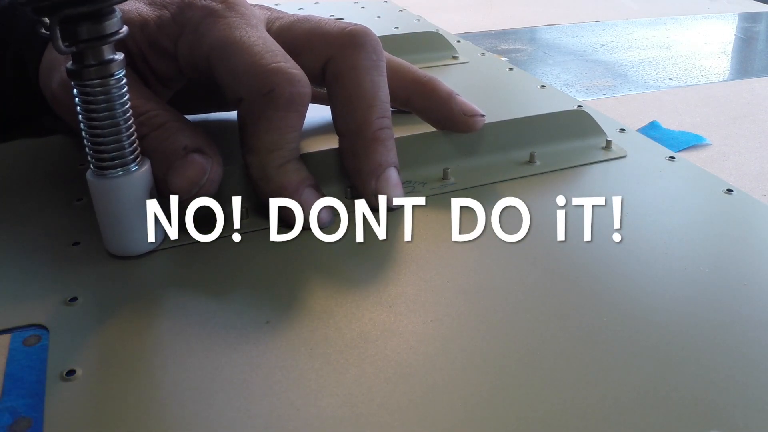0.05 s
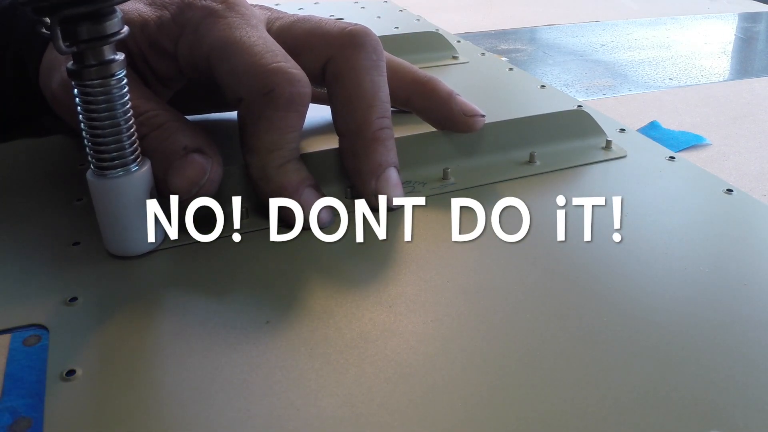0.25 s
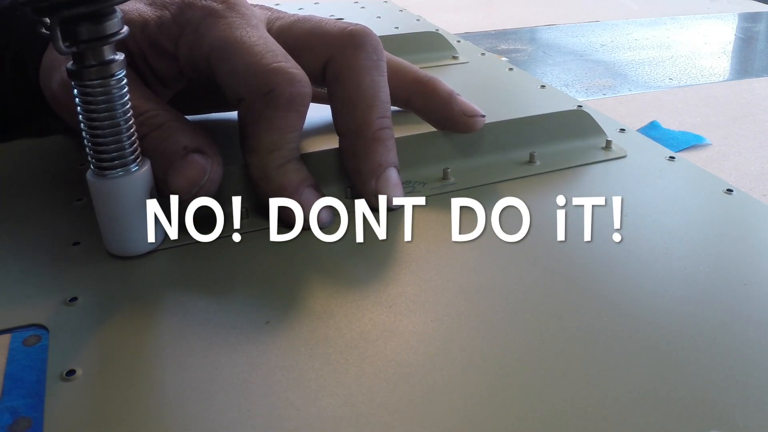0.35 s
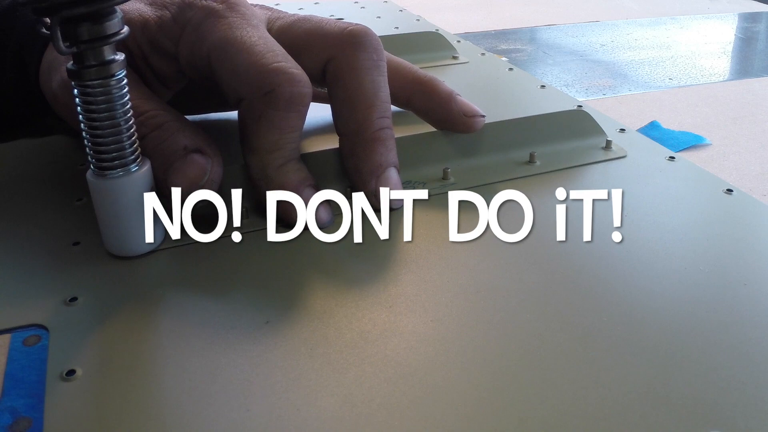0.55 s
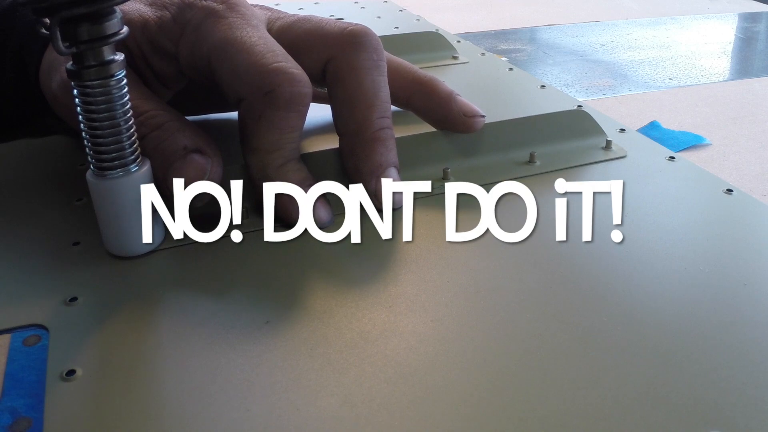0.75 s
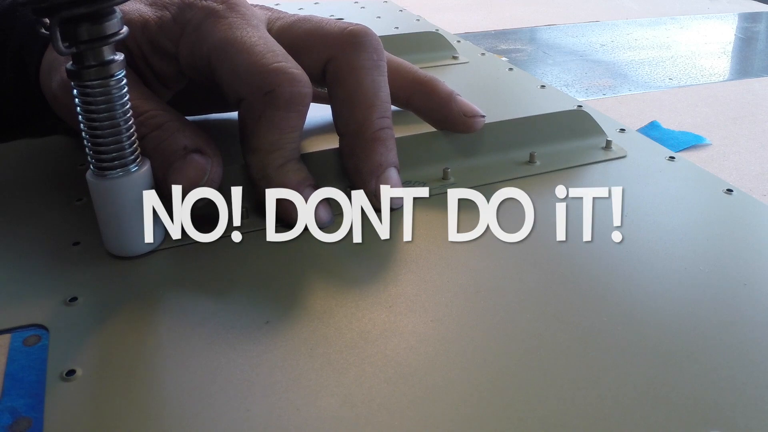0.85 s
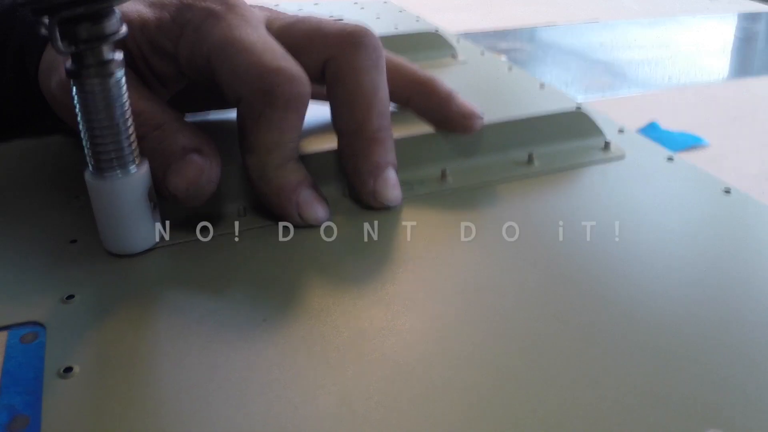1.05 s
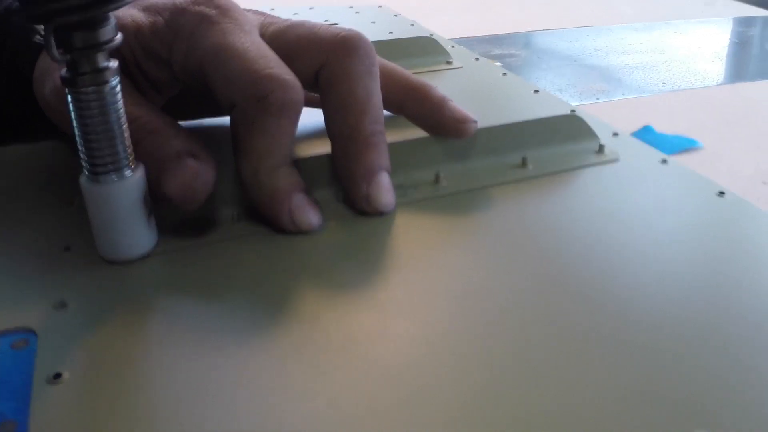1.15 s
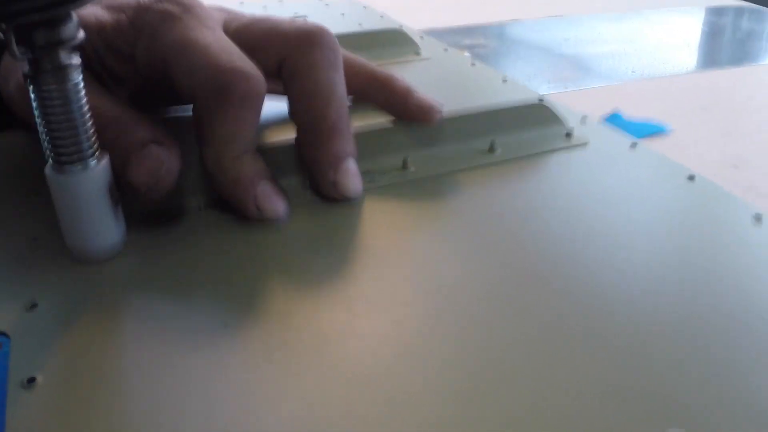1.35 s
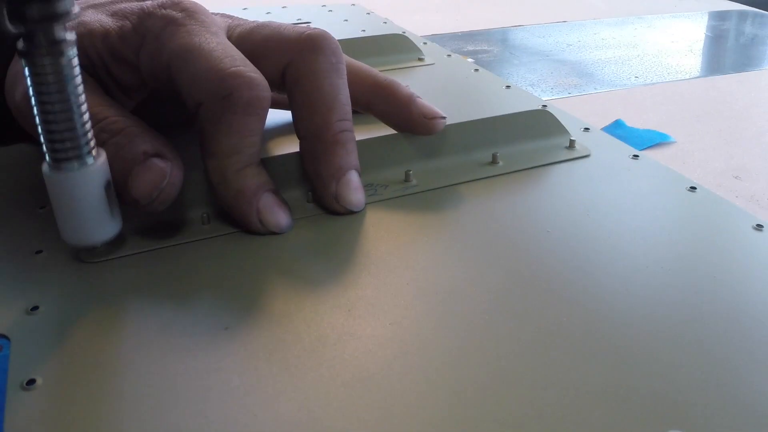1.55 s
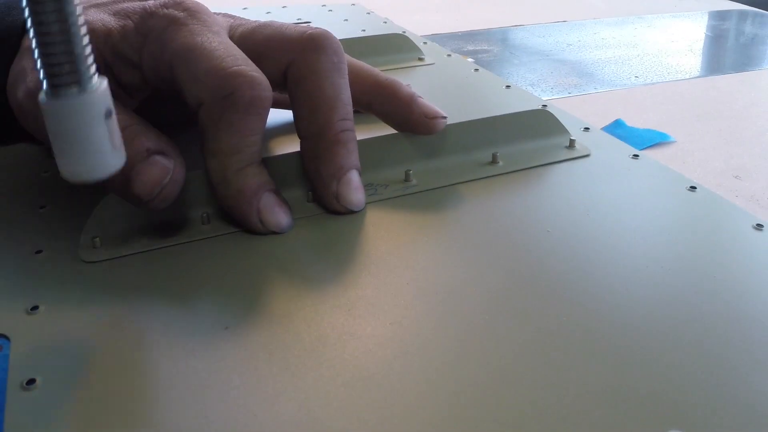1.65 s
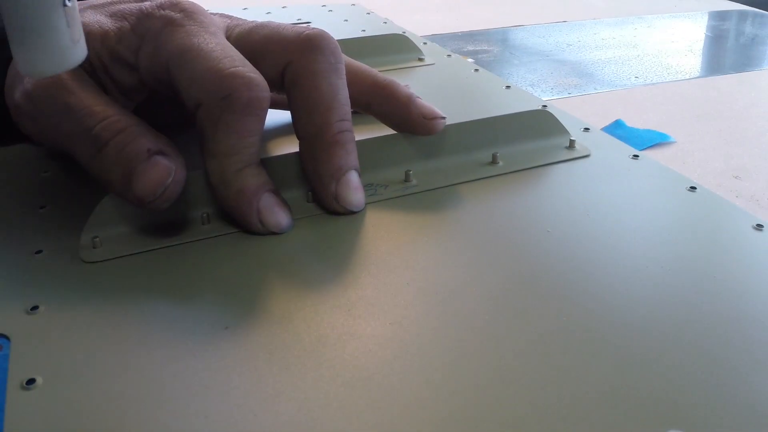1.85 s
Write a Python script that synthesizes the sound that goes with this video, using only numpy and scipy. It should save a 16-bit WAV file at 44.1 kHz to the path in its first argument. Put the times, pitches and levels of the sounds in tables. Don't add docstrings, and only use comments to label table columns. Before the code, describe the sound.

Close microphone on an air-powered riveting hammer: air rushes through its ports and rises to a whistle, cuts off, then the piston bangs thin aluminium in a quick burst, fading into a quiet, echoing shop.

```python
import sys
import numpy as np
from scipy import signal
from scipy.fft import rfft, irfft
from scipy.io import wavfile
from scipy.ndimage import uniform_filter1d

SR = 44100
rng = np.random.default_rng(int(sys.argv[2]) if len(sys.argv) > 2 else 0)


def rack_gain(trim_db):
    fader = np.asarray(trim_db, float)
    return 10 ** (fader / 20)


def dump_mix(stems):
    frames = np.atleast_2d(stems).T
    limited = np.clip(frames, -1, 1)
    pcm = np.round(limited * 32767).astype(np.int16)
    wavfile.write(sys.argv[1], SR, pcm)


N = 83790
TOP_HZ = 15270

# frequency in Hz, level in dB.
HUM_COLOUR = [(25, -0.5), (60, -4), (150, -7), (400, -8.5), (800, -12.5), (1100, -24.5), (4000, -41),
              (15000, -52)]
# centre in Hz, level in dB, time to fade by 60 dB in seconds.
SHOP_TAIL = [(60, -31.5, 1), (125, -37.5, 1), (265.4, -43, 0.95), (495, -43, .65), (926, -40.5, 0.84),
             (1884, -44, 0.65), (4270, -42, .55), (8200, -45.5, .45), (13000, -45.5, .35)]
# time in seconds, level in dB.
AIR_FLOW = [(0, -34), (.015, -31.5), (.06, -36.5), (.178, -36), (.2, -25), (.27, -21.5), (.5, -21.5),
            (.8, -21.5), (.94, -20), (1.075, -17), (1.1, -23), (1.128, -21), (1.142, -41), (1.16, -45.5),
            (1.4, -60), (1.46, -69), (1.6, -53.5), (1.9, -95.5)]
# frequency in Hz, width in Hz, level in dB.
PORT_RESONANCES = [(1395, 456, -14.5), (2052, 347, -7.5), (2664, 143, -9.5), (3457, 630, -9),
                   (4500, 199, 1.5), (5100, 296, -6), (6110, 960, -8), (6906, 300, -6), (7550, 300, -10.5),
                   (8710, 650, -14.5), (9400, 450, -17), (11100, 380, -18.5), (12600, 410, -21.5),
                   (13700, 500, -27)]
# frequency in Hz, level in dB.
JET_COLOUR = [(30, -22), (100, -27.5), (400, -29), (800, -25), (1100, -26), (2000, -40)]
# start in seconds, level in dB, length in seconds.
EXHAUST_PUFFS = [(1.1291, -11, 0.0038), (1.175, -40, .006), (1.233, -34, 0.0036), (1.241, -41, 0.0025),
                 (1.287, -38, 0.0035), (1.293, -40, 0.0026), (1.341, -33, 0.0027), (1.349, -34, 0.0022),
                 (1.399, -34, 0.0025), (1.404, -37, 0.0026), (1.474, -49, .004), (1.6396, -35.5, .003)]
# start in seconds, level in dB, frequency in Hz,
# time to fade by 60 dB in seconds.
BENCH_JOLTS = [
    (1.0973, -23, 242, 0.057),
    (1.11, -21.5, 128, 0.069),
    (1.1296, -11, 148, 0.044),
]
# start in seconds, then force, thud, ring and crack, all in dB.
PISTON_BLOWS = [
    (1.0968, -22.5, 3.5, -9.5, -7),
    (1.1306, -6, 0, -3.5, -8.5),
    (1.1482, 0, 0, 1, 7),
    (1.2038, 2, -5.5, -3, 2.5),
    (1.2580, -4.5, 1.5, 3.5, 6.5),
    (1.3127, 0.5, -3.5, -1, 1.5),
    (1.3681, -1.5, -2.5, 0.5, 3.5),
    (1.4276, 2, -5, -2, -0.5),
    (1.5369, -8, 1.5, 4.5, 6.5),
]
# frequency in Hz, level in dB, time to fade by 60 dB in seconds.
THUD_MODES = [(43.4, -34, .2), (71, -27, .05), (95.7, -32, 0.27), (135, -25, 0.045), (213, -23.5, 0.15),
              (267.2, -22.5, 0.28), (357, -13, 0.055), (374, -30, 0.44), (442, -17, 0.031),
              (475.5, -19, 0.086)]
# frequency in Hz, level in dB, time to fade by 60 dB in seconds.
RING_MODES = [(634.6, -21, 0.09), (756, -22.5, 0.079), (887, -23, 0.11), (1217, -19.5, 0.062),
              (1300.4, -22.5, 0.11), (1617, -23, 0.098), (1688, -20.5, 0.056), (1866, -23.5, 0.077),
              (2398, -26.5, 0.052), (3010, -27.5, 0.028), (3694, -33, 0.015), (4540, -33.5, 0.019),
              (5350, -27.5, 0.013)]
# frequency in Hz, level in dB.
CRACK_COLOUR = [(2500, 4), (5000, -0.5), (8000, -4.5), (12000, -9), (16000, -19)]


def bins_hz(n):
    return np.arange(n // 2 + 1) * SR / n + 1


def shade(table, n):
    hz, db = np.array(table, float).T[:2]
    return rack_gain(np.interp(np.log(bins_hz(n)), np.log(hz), db))


def octave_hump(hz, n):
    return np.exp(-2 * np.log2(bins_hz(n) / hz) ** 2)


def unit(x):
    return x / np.sqrt(np.mean(x ** 2))


def noise(gain, n):
    return unit(irfft(rfft(rng.standard_normal(n)) * gain, n))


def walk(rate_hz):
    hold = int(SR / rate_hz)
    steps = np.repeat(rng.standard_normal(N // hold + 1), hold)
    smooth = uniform_filter1d(uniform_filter1d(steps, hold), hold)
    return unit(smooth[:N])


def fall(t, t60):
    return np.exp(-np.log(1000) * np.maximum(t, 0) / t60)


def knock(t, start_s, db, hz, t60):
    since = t - start_s
    return rack_gain(db) * (t > start_s) * fall(since, t60) * np.sin(2 * np.pi * hz * since)


def hum(t):
    level_db = -53 + 1.9 * walk(5.2)
    duck_db = -12 * (t > 1.11)
    return noise(shade(HUM_COLOUR, N) * (bins_hz(N) < TOP_HZ), N) * rack_gain(level_db + duck_db)


def shop(x):
    n, gap_s = 32768, 0.0067
    t = np.arange(n) / SR
    tail = 0
    for hz, db, t60 in SHOP_TAIL:
        gain = octave_hump(hz, n) * (bins_hz(n) < TOP_HZ)
        band = irfft(rfft(rng.standard_normal(n)) * gain, n)
        tail = tail + rack_gain(db) * band * fall(t, t60)
    return signal.fftconvolve(x, tail * np.clip(t / gap_s, 0, 1))[:N]


def sway(t):
    start_s, rise_s, t60 = 1.6, 0.2, 0.6
    swell = np.clip((t - start_s) / rise_s, 0, 1) * fall(t - start_s - rise_s, t60)
    return rack_gain(-43.5) * noise(octave_hump(37, N), N) * swell


def port_hiss(duct):
    f = bins_hz(N)
    white = rfft(rng.standard_normal(N))
    hiss = 0
    highest_port = (15000, 700, -29)  # Hz, width in Hz, dB
    for k, (hz, width_hz, db) in enumerate(PORT_RESONANCES + [highest_port]):
        port = 1 / (1 + 1j * (f / hz - hz / f) * hz / width_hz)
        flutter = rack_gain(db + 0.73 * walk(29.63))
        hiss = hiss + (-1) ** k * flutter * irfft(white * port * duct, N)
    return unit(hiss)


def duct_whistle(duct, flow_db):
    hz, width_hz = 1382, 59.5
    level_db = -14 + 3 * (flow_db + 18)
    return rack_gain(level_db) * noise(duct / (1 + ((bins_hz(N) - hz) / width_hz) ** 2), N)


def exhaust(t):
    puffs = 0
    for start_s, db, length_s in EXHAUST_PUFFS:
        opening = np.clip((t - start_s) / 0.0007, 0, 1)
        puffs = puffs + rack_gain(db) * opening * fall(t - start_s - length_s, 4 * length_s)
    return puffs


def air(t):
    f = bins_hz(N)
    duct = (f < TOP_HZ) / np.sqrt(1 + (1270 / f) ** 40)
    flow_db = np.interp(t, *np.array(AIR_FLOW).T)
    flow = rack_gain(flow_db) + exhaust(t)
    roar = rack_gain(-24) * noise(shade(JET_COLOUR, N) * (f < TOP_HZ), N)
    return flow * (port_hiss(duct) + duct_whistle(duct, flow_db) + roar)


def valve_tick(t):
    return knock(t, start_s=1.118, db=-0.5, hz=1849.5, t60=0.0052)


def jolts(t):
    return -sum(knock(t, *row) for row in BENCH_JOLTS)


def ring(modes, t, chance):
    hz, db, t60 = np.array(modes).T[:, :, None]
    tune, size = chance[:, :len(modes), None]
    hz = hz * (1 + 0.004 * tune)
    level = rack_gain(db + 1.5 * size)
    return (level * fall(t, t60) * np.cos(2 * np.pi * hz * t)).sum(axis=0)


def hammer():
    n = 16384
    t = np.arange(n) / SR
    out = np.zeros(N + n)
    chance = rng.standard_normal((len(PISTON_BLOWS), 2, 2, 16))
    steel = shade([(1200, -30)] + CRACK_COLOUR, n)
    same_crack = noise(steel, n)
    contact_s, contact_db, lift_s = 0.0047, 9.5, 0.00037
    press = rack_gain(contact_db / (1 + np.exp(np.clip((t - contact_s) / lift_s, -50, 50))))
    crack_hold_s, crack_t60, rebound_s, rebound_db = 0.0021, 0.01, 0.0063, -14.5
    rebound = rack_gain(rebound_db) * (t > rebound_s) * fall(t - rebound_s, 2 * crack_t60)
    snap = fall(t - crack_hold_s, crack_t60) + rebound
    rise = 1 - np.exp(-t / 0.00019)
    for (start_s, db, thud_db, ring_db, crack_db), luck in zip(PISTON_BLOWS, chance):
        crack = rack_gain(-24 + crack_db) * (same_crack + 1.2 * noise(steel, n)) * snap
        thud = rack_gain(thud_db) * ring(THUD_MODES, t, luck[0])
        sheet = thud + rack_gain(ring_db) * ring(RING_MODES, t, luck[1])
        i = int(start_s * SR)
        out[i:i + n] += rack_gain(db) * (press * sheet + crack) * rise
    return out[:N]


def scene():
    t = np.arange(N) / SR
    blows = valve_tick(t) + jolts(t) + hammer()
    return (hum(t) + shop(blows) + sway(t) + air(t) + blows)[None]


def roll_off(x):
    return signal.sosfilt(signal.butter(12, 16470, fs=SR, output="sos"), x)


def record(dry):
    low_pass = signal.butter(10, 16200, fs=SR, output="sos")
    x = signal.sosfilt(low_pass, dry)
    mix = x / (1 + np.abs(x / 0.98) ** 6) ** (1 / 6)
    return roll_off(mix)


dry = scene()
out = record(dry)
dump_mix(out)
```